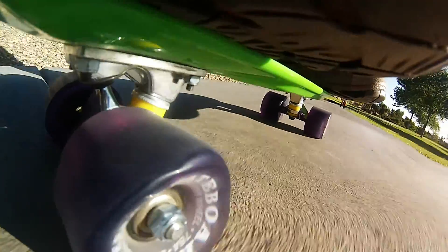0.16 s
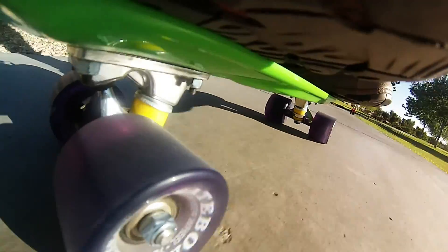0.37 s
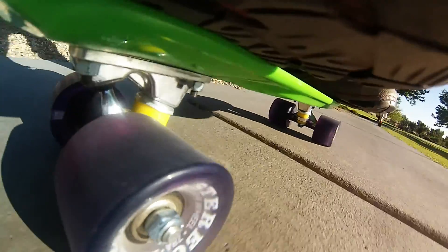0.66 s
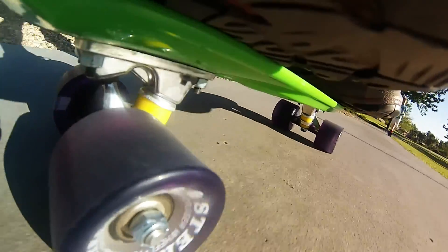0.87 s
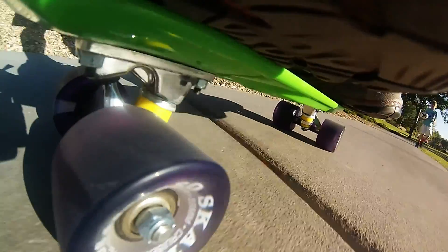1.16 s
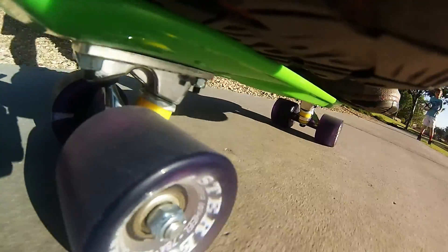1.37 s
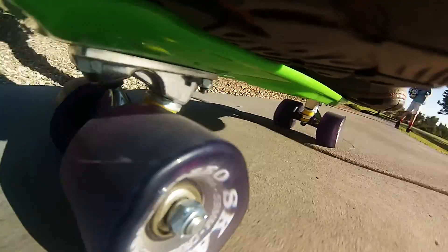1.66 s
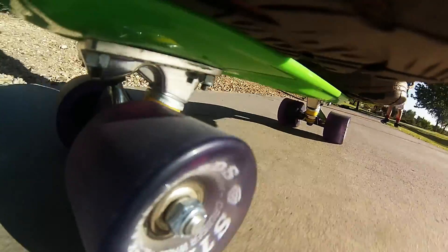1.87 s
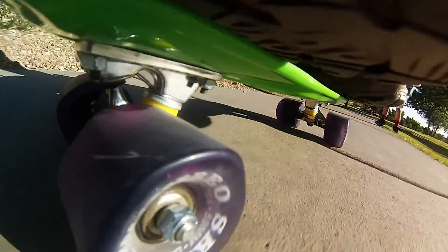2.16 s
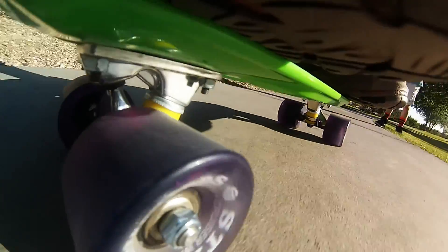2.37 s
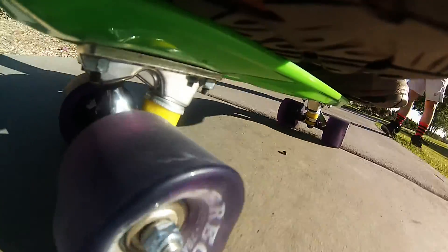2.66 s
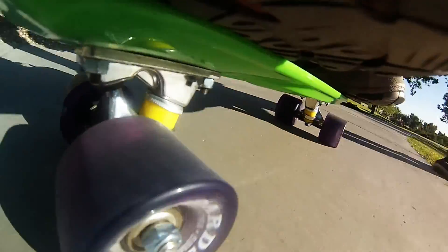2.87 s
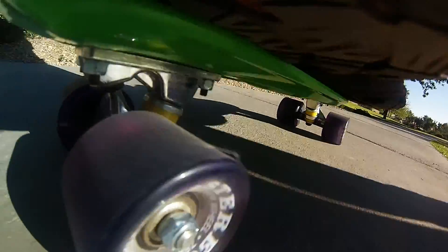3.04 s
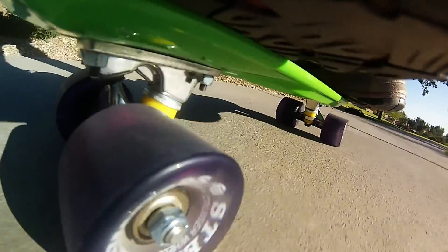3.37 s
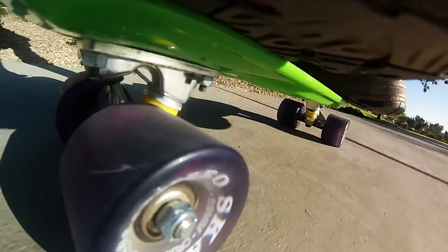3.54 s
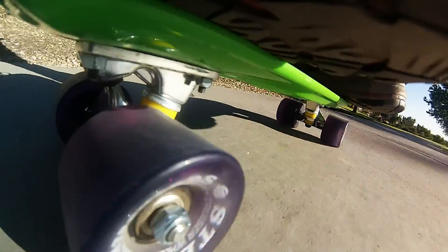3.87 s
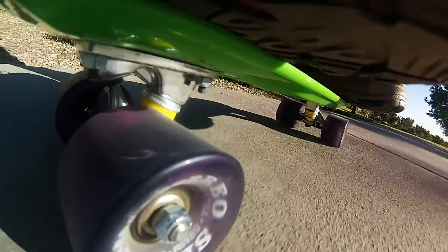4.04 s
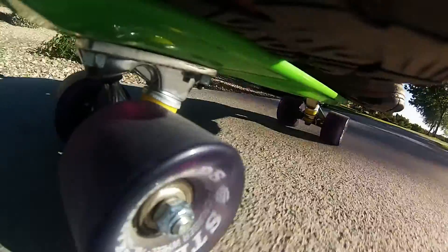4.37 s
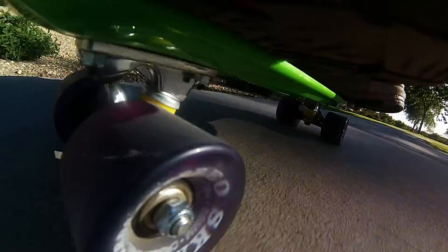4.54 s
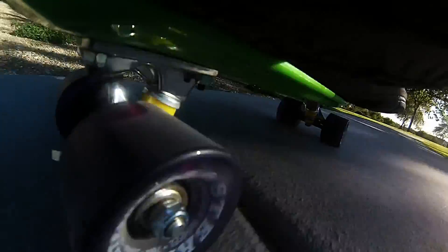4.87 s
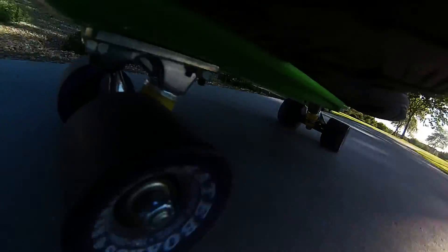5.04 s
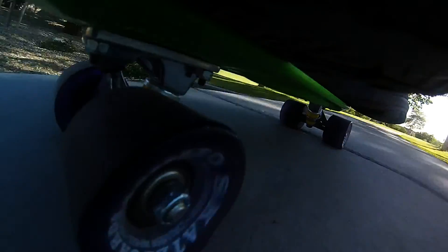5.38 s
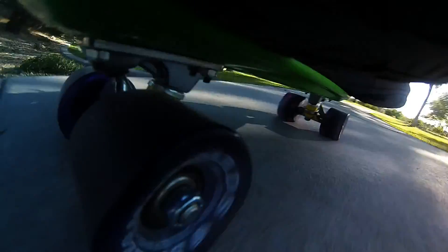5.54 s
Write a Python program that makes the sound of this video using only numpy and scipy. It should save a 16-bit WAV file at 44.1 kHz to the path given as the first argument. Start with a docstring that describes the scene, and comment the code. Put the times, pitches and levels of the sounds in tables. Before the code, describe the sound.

A plastic skateboard rolls on a concrete path outdoors, heard very close to a wheel. A dull, grainy rumble runs throughout, while two wheel sets drop into each joint with hard double clacks roughly every half second. Loose metal knocks and small ticks trail the blows, with light low wind on the microphone. Around four and a half seconds the surface gets rougher and rattly, then calms. The loudest hits distort slightly.

```python
"""On a concrete path a plastic skateboard rolls by, heard through a small camera clamped beside a wheel.
Road grain is noise that shakes the resonances of deck, trucks and camera case; wind buffets the microphone.
At each joint the wheels drop in: the deck bends, cracks and shudders. Ragged bursts make loose metal knock,
and clumps of faint ticks make it rattle. The camera's gain control ducks the sound after blows, and they clip."""
import sys
import numpy as np
from scipy import signal
from scipy.fft import rfft, irfft
from scipy.io import wavfile
from scipy.ndimage import uniform_filter1d

SR = 44100
rng = np.random.default_rng(int(sys.argv[2]) if len(sys.argv) > 2 else 0)


def wav_out(sig):
    """Save sig, one row per channel (or a flat mono array), as 16-bit PCM at SR to the path in sys.argv[1]."""
    wavfile.write(sys.argv[1], SR, np.round(np.clip(np.atleast_2d(sig).T, -1, 1) * 32767).astype(np.int16))


N = 251811

# Levels in the tables are relative; each source is given its place in the mix by its own function.
# Road grain under the wheels: [t/s, shaking level/dB]
ROAD = [(0.0, -26.5), (0.3, -25), (0.6, -26.5), (0.75, -31.5), (1.0, -23), (1.3, -26), (1.65, -24),
        (2.0, -22), (2.35, -27.5), (2.65, -19.5), (2.95, -27), (3.16, -18), (3.38, -21), (3.58, -20.5),
        (3.87, -25), (4.2, -17), (4.45, -11.5), (4.75, -22), (4.98, -19.5), (5.12, -26), (5.27, -19),
        (5.45, -23.5), (5.71, -23.5)]
# Gusts at the microphone: [t/s, level/dB]
GUSTS = [(0.0, -26.5), (0.3, -40.5), (1.4, -38.5), (2.2, -41), (2.8, -38.5), (3.25, -28), (3.7, -32),
         (4.0, -30.5), (4.17, -31.5), (4.4, -26.5), (5.02, -51), (5.26, -28), (5.42, -31), (5.71, -34)]
# Spectrum of the wind: [f/Hz, density/dB per Hz]
WIND_SPECTRUM = [(12, -45.5), (22, 10), (45, -12), (90, -10), (200, -56.5)]
# Rattling of loose parts on rough stretches: [t/s, level/dB]
RATTLE = [(0.0, -78), (0.4, -67.5), (0.5, -85.5), (1.4, -81), (1.9, -79), (2.02, -65), (2.12, -68),
          (2.2, -80), (2.42, -78), (2.51, -63), (2.62, -82), (2.95, -74), (3.1, -67), (3.22, -56),
          (3.55, -65.5), (3.85, -75.5), (3.95, -54.5), (4.18, -46), (4.4, -42), (4.5, -43), (4.6, -58),
          (5.0, -83.5), (5.4, -72), (5.71, -68)]
# Wheels dropping into joints: [t/s of the deepest bend, bend level/dB, nominal bend width/ms,
# crack delay after the bend/ms (negative is earlier), crack level/dB, shudder level/dB, shudder length/ms]
JOINTS = [(0.0911, -2, 2.26, 0.33, -2.5, -26, 12.7), (0.2335, 2.5, 1.67, 0.94, -4.5, -34.5, 56),
          (0.6738, -14.5, 2, 2.3, -8.5, -31.5, 27), (0.814, 3.5, 0.83, -2.5, 0, -21, 24),
          (1.1631, -9, 0.37, -9.5, -6.5, -21, 33.4), (1.301, -6, 1.12, -8, 1.5, -20, 21.2),
          (1.7079, -15, 3, -2, 0.5, -18.5, 18.5), (1.8287, 6.5, 1.12, 0, -2, -17.5, 14.2),
          (2.2172, -2, 2.1, -2.5, -18, -24.5, 27), (2.3431, 2.5, 1.58, -3, -8, -21, 32.4),
          (2.6271, -35, 1.4, 2.5, -16, -28.5, 10.3), (2.7401, -2.5, 2.15, -2.5, -13, -23, 11),
          (2.8511, 3.5, 1.32, 0, -10, -31.5, 46), (3.1959, -3.5, 2.1, -4, 0, -22.5, 30),
          (3.339, 0.5, 1.42, -2, 0.5, -39, 48), (3.6753, -7, 2.5, -5.5, -8, -23.5, 19.5),
          (3.7957, -4, 1.16, -2.5, 3.5, -25.5, 29), (4.2101, -5, 0.62, -5.5, 1, -20, 27.7),
          (4.3446, -1.5, 1.45, 0.9, 4.5, -22, 22), (4.837, 0, 2.65, -3, -4.5, -24.5, 22),
          (4.9709, -11, 0.59, -2.5, 9, -14.5, 19), (5.2222, -13.5, 4.4, -1.2, -15, -30.5, 14),
          (5.439, -3, 2.5, -2.5, -9, -24, 26.4), (5.575, -1.5, 2.3, -2.5, -14.5, -24, 38.6)]
# Truck and axle knocking on their play: [t/s, level/dB, treble level relative to the knock/dB]
KNOCKS = [(0.0881, -13, -17), (0.095, -11.5, -9), (0.231, -10, -4), (0.2349, -6, -14), (0.254, -20, -13),
          (0.276, -28, -9), (0.2813, -33, -7), (0.2868, -29, -6), (0.6714, -16, -6), (0.6785, -25.5, 0),
          (0.6826, -14, -23), (0.8062, -10.5, -11), (0.8135, -10, -9), (0.829, -21, -12),
          (0.9938, -35, -31), (1.1474, -19, -13), (1.155, 0.5, -15), (1.1774, -28, -18),
          (1.2039, -24.5, -3), (1.2857, -25, -7), (1.2948, 0.5, -18), (1.312, -14.5, -24.5),
          (1.323, -28, -6.5), (1.696, -23, -17), (1.7066, -7, -3), (1.721, -17.5, -30), (1.8182, -13, -8),
          (1.8274, 4.5, -27), (1.836, -12, -9), (1.85, -21, -19), (1.9032, -18.5, -12), (1.908, -21.5, -10),
          (2.0943, -35.5, -15), (2.2149, -11, -5.5), (2.2254, -23, -8), (2.234, -15, -15),
          (2.3458, -13, -4.5), (2.3527, -6, -18), (2.3607, -13, -27), (2.3698, -20.5, -8),
          (2.3826, -24, -6), (2.625, -10, -9), (2.738, -9, -11.5), (2.7731, -20.5, -5), (2.843, -13.5, -10),
          (2.8493, -10, -9), (2.8549, -14.5, -11), (2.8727, -14, -19), (2.8881, -39, -7), (2.8997, -35, -5),
          (2.905, -33, -6), (2.9126, -28, -10), (3.05, -30, -8), (3.1283, -38, -7), (3.1398, -22, -27),
          (3.1472, -14.5, -4), (3.1633, -16, -10), (3.1944, 0.5, -14.5), (3.211, -12.5, -27),
          (3.23, -20, -10), (3.2395, -24, -4), (3.251, -22, -7), (3.2571, -26, -9), (3.3237, -12, -6),
          (3.3339, -5, -17), (3.3399, 4, -20), (3.3605, -23, -2), (3.3685, -16.5, -3), (3.3816, -19.5, 1),
          (3.4194, -22.5, -11), (3.508, -27.5, -10), (3.5146, -21, -25), (3.526, -27.5, -26),
          (3.5327, -37, -9), (3.6685, 2.5, -37), (3.6724, -11.5, -10), (3.683, -30, 0), (3.6977, -34, -3),
          (3.7071, -35.5, 0), (3.7954, 5.5, -13), (3.8044, -21, -22), (3.8215, -21.5, -4),
          (3.8282, -26.5, 1), (3.8451, -29, -9), (3.9249, -30, -20), (3.9976, -45, -6), (4.0232, -42, -8),
          (4.0313, -40, -8), (4.049, -44, -4), (4.066, -41, -4), (4.0827, -50, 2), (4.2057, 2, -6.5),
          (4.2166, -22.5, -18.5), (4.235, -23, -16), (4.2617, -20.5, -14), (4.266, -21, -8),
          (4.2709, -20, -9), (4.2759, -22, -9), (4.2839, -25, -13), (4.3018, -26, -15), (4.3112, -29, -14),
          (4.321, -34, -11), (4.3376, -20, -14), (4.3442, 2.5, -32), (4.3613, -17, -26), (4.375, -14, -9),
          (4.4053, -9.5, -6), (4.416, -18, -13), (4.43, -15, -9), (4.462, -14, -12), (4.4786, -12.5, -11),
          (4.4869, -9, -16), (4.49, -25, -2), (4.5184, -17.5, -18), (4.8346, -2.5, -10.5),
          (4.849, -18, -22), (4.866, -28, -1), (4.941, -14.5, -25), (4.945, -17, -18), (4.9506, -20, -9),
          (4.9688, -33, -13), (4.9794, -16, -32), (5.2208, -18.5, -10.5), (5.414, -32, -15),
          (5.44, -9, -10), (5.444, -15.5, -36), (5.4563, -23, -15), (5.4825, -35, -5), (5.56, -34, -15),
          (5.574, -10.5, -38), (5.5803, -9.5, -29), (5.584, -9.5, -16), (5.599, -24, -4),
          (5.6348, -26.5, -7.5), (5.6505, -33, -14)]
# Modes of deck, trucks and camera case: [f/Hz, nominal width/Hz, level when rolled/dB, level when struck/dB]
MODES = [(29.8, 33, -8.5, -6), (84.6, 26.7, 0.5, 7.5), (175, 40.2, 2, -7.5), (265.7, 63, -8.5, 2),
         (363.3, 57.3, -1.5, -0.5), (474, 152, -11, -2), (588.4, 132.5, -14, 2), (756.7, 94, -12.5, -1),
         (926, 96, -25, -4.5), (1134, 216, -19.5, 3.5), (1259, 317, -21, -14), (1560, 250, -32.5, -4.5),
         (1984, 152, -24.5, 2), (2098, 155, -28.5, 6.5), (3106, 210, -70.5, -6.5), (3082, 130, -45, -10.5),
         (3470, 150, -47.5, -20), (3820, 130, -45, -18), (4490, 260, -53, -8.5), (5260, 360, -63, -3.5),
         (6030, 1100, -65, 3), (7100, 290, -80.5, -8.5), (9300, 2700, -96, -42.5), (10850, 840, -92, -4),
         (13400, 1200, -92.5, -29)]

# After a joint the wheels regain grip: duller and quieter at first
SETTLE_S, SETTLE_DB, SETTLE_TILT_DB, TILT_DB = 0.079, -1, -1, 1.48  # tilts are per octave
# The deck's low bend swells once the wheels have settled
HUM_AFTER_S, HUM_WIDTH_S, HUM_DB, HUM_DIP_DB = 0.18, 0.055, 1, -0.5
# The slowest bends keep swaying after a joint
SWAY_DB, SWAY_S = 4.5, 0.12
# Small knocks that trail each joint
CHATTER_S, CHATTER_DB, CHATTER_FADE_DB = 0.035, -38, -10
CHATTER_TREBLE_DB, CHATTER_SPREAD_DB = -12.5, 5.5
HISS_DB = -80.5  # the preamplifier's faint hiss, before its low-pass filters; added after the gain control
EDGE_HZ = 16220  # upper band limit


def gain_of(db):
    """Turns decibels into a factor."""
    return 10 ** (np.asarray(db) / 20)


def evened(x):
    """Scales a sound to rms 1."""
    return x / np.sqrt(np.mean(x ** 2) + 1e-20)


def curve(rows):
    """Draws straight lines through the columns of a table, one value per sample."""
    s, *columns = np.transpose(rows)
    return [np.interp(np.arange(N) / SR, s, column) for column in columns]


def drift(rate_hz):
    """Wanders slowly at random, rms 1: low-passed noise drawn at every 16th sample."""
    low_pass = signal.butter(2, rate_hz, fs=SR / 16, output="sos")
    slow = signal.sosfilt(low_pass, rng.standard_normal(N // 16 + 1))
    return evened(np.interp(np.arange(N) / 16, np.arange(len(slow)), slow))


def mode(x, hz, width):
    """One resonance applied twice, so that the valleys beside it stay dark; gain 1 at the centre."""
    pole = np.exp((2j * np.pi * hz - 1.55 * np.pi * width) / SR)
    for _ in range(2):
        x = signal.lfilter([1 - abs(pole)], [1, -pole], x)
    return 2 * x.real


def struck(force, lo, hi, damping):
    """The modes from lo to hi Hz ring after a force, widened by damping; a one-sample blow peaks at 1."""
    rows = [(hz, width * damping + 0.02 * hz, db) for hz, width, _, db in MODES if lo <= hz < hi]

    def ring(x):
        return sum(gain_of(db) * mode(x, hz, width) / width for hz, width, db in rows)

    return ring(force) / abs(ring(signal.unit_impulse(2000))).max()


def bursts(times, db, ms, tail_db=-61.0):
    """A ragged force at each time: noise that rises fast and decays over ms, then a weak slower tail."""
    length = 900  # samples
    out = np.zeros(N + length)
    noises = rng.standard_normal((len(times), length))
    u = np.arange(length) / (SR * ms / 1000)
    envelope = np.minimum(7.1 * u, 1) * (np.exp(-u) + gain_of(tail_db) * np.exp(-u / 11.0))
    for s, level_db, noise in zip(times, db, noises):
        push = noise * envelope
        out[round(s * SR):][:length] += gain_of(level_db) * push / np.linalg.norm(push)  # equal energy
    return out[:N]


def rolling():
    """Grain noise shakes every mode; each flickers by itself, and all throb together over bumps."""
    t = np.arange(N) / SR
    joint_s = np.array([-1.] + [s for s, *_ in JOINTS])
    since = t - joint_s[np.searchsorted(joint_s, t) - 1]  # seconds since the last joint
    loose = np.exp(-since / SETTLE_S)
    shake_db = curve(ROAD)[0] + SETTLE_DB * loose
    tilt_db = TILT_DB + SETTLE_TILT_DB * loose
    hum_db = HUM_DB * np.exp(-((since - HUM_AFTER_S) / HUM_WIDTH_S) ** 2) + HUM_DIP_DB * loose
    sway_db = SWAY_DB * np.exp(-((since - 0.08) / SWAY_S) ** 2)
    after = np.exp(-((since - 0.065) / 0.047) ** 2)
    bumps = drift(11.8)
    out = 0
    for hz, width, rolled_db, _ in MODES:
        octaves = np.log2(hz / 500)
        db = rolled_db - 1.55 * octaves + tilt_db * np.clip(octaves, -1, 2)
        db = db + hum_db * (150 < hz < 300) + sway_db * (hz < 120)
        db = db - 5.8 * after * np.exp(-(octaves / 1.6) ** 2)  # modes around 500 Hz dip after a joint
        flicker_db = 1.2 * drift(10.0)
        soft = signal.butter(2, 1.25 * hz, fs=SR, output="sos")  # little spills above each mode
        ringing = signal.sosfilt(soft, mode(rng.standard_normal(N), hz, width))
        out = out + gain_of(db + 1.7 * bumps + flicker_db) * ringing
    return gain_of(shake_db + 25.0) * out


def wind():
    """Lumpy low buffeting at the microphone port: noise shaped in frequency, then swelled by gusts."""
    hz = np.fft.rfftfreq(N, 1 / SR)
    f, db = np.transpose(WIND_SPECTRUM)
    shape_db = np.interp(np.log(hz + 1), np.log(f), db, -90, -90)
    noise = irfft(rfft(rng.standard_normal(N)) * gain_of(shape_db), N)
    return gain_of(curve(GUSTS)[0] + 6.5 + 1.2 * drift(5.9)) * evened(noise)


def rattle():
    """Loose parts tick faintly, unevenly and in clumps; each ragged touch lasts about a millisecond."""
    chance = 240.0 * gain_of(3.0 * drift(15.0)) / SR  # of a tick at each sample
    size = gain_of(3.0 * np.minimum(rng.exponential(1, N), 4)) * (rng.random(N) < chance)
    fade = np.exp(-1 / (0.0007 * SR))
    ticks = signal.lfilter([1], [1, -fade], size) * rng.standard_normal(N)
    sound = struck(ticks, 4000, 9000, damping=2.4)
    sound += 0.18 * struck(ticks, 9000, 20000, damping=1.2)
    sound += 1.8 * struck(ticks, 1500, 4000, damping=1.6)
    return gain_of(curve(RATTLE)[0]) * evened(sound)


def joints():
    """The deck bends down and springs back, its modes ring, and the whole board shudders for a moment."""
    before, behind = 1000, 5000  # samples around the deepest bend
    t = np.arange(-before, behind) / SR
    bend, shaking = np.zeros(N + behind), np.zeros(N + behind)
    for s, db, ms, lag, _, shudder_db, length in JOINTS:
        near = slice(round(s * SR) - before, round(s * SR) + behind)
        u = t / (0.65 * ms / 1000)
        bend[near] -= gain_of(db) * (1 - u ** 2) * np.exp(-u ** 2 / 2)
        # the shudder starts 3.5 ms ahead of the bend, or of the crack where that is earlier
        v = np.clip((t - min(lag, 0) / 1000 + 0.0035) / (length / 1000), 0, 3)
        shaking[near] += gain_of(shudder_db) * np.minimum(11.0 * v, 1) * np.exp(-v ** 3)

    s, db, ms, lag, crack_db, *_ = np.transpose(JOINTS)
    push_db = db + 20 * np.log10(ms / 2.45)  # a broad bend hands the low modes more momentum
    low = struck(bursts(s, push_db, 0.2), 60, 500, damping=1.3)
    crack = struck(bursts(s + lag / 1000, crack_db, 2.0), 500, 1500, damping=2.0)

    force = rng.standard_normal(N) * gain_of(4.77 * drift(170.0))  # ragged: parts touch and let go
    shudder = evened(struck(force, 200, 1500, damping=1.0))
    shudder += 0.27 * evened(struck(force, 1500, 4000, damping=1.3))
    shudder += 0.028 * evened(struck(force, 4000, 20000, damping=0.22))

    thump = gain_of(3.5) * bend[:N] + gain_of(-3.0) * low
    return thump + gain_of(11.5) * crack + gain_of(12.5) * shaking[:N] * shudder


def knocks():
    """Metal hits metal: ragged blows set off short rings of the middle and high modes."""
    s, db, treble_db = np.hstack([np.transpose(KNOCKS), chatter()])
    body = struck(bursts(s, db, 0.54, tail_db=-14.0), 1500, 4000, damping=2.67)
    deck = struck(bursts(s, db, 0.94), 550, 1500, damping=3.0)  # the deck answers each knock
    top = struck(bursts(s, db + treble_db, 0.36, tail_db=-15.0), 4000, 7000, damping=0.53)
    edge = struck(bursts(s, db + treble_db, 0.94, tail_db=-33.0), 7000, 20000, damping=0.83)
    return gain_of(6.0) * body + gain_of(1.5) * deck + gain_of(1.5) * top + gain_of(-7.0) * edge


def chatter(count=4):
    """A few small knocks at chance moments after each joint, on average weaker the later they come."""
    late = rng.random((len(JOINTS), count))
    level_spread, treble_spread = rng.standard_normal((2, len(JOINTS), count))
    s = np.array(JOINTS)[:, :1] + 0.005 + CHATTER_S * late
    db = CHATTER_DB + CHATTER_FADE_DB * late + CHATTER_SPREAD_DB * level_spread
    treble_db = CHATTER_TREBLE_DB + CHATTER_SPREAD_DB * treble_spread
    return np.array([s, db, treble_db]).reshape(3, -1)


def scene():
    """All sources add up at the one microphone."""
    return (rolling() + wind() + rattle() + joints() + knocks())[None]


def record(dry):
    """Gain control falls a little after each blow and recovers; the converter clips; then the band limit."""
    power_db = 10 * np.log10(abs(uniform_filter1d(dry[0] ** 2, 300)) + 1e-12)
    fall = np.arange(N) * 94.8 / SR  # the held peak level sinks by 94.8 dB a second
    held_db = np.maximum.accumulate(power_db + fall) - fall
    over_db = np.maximum(held_db + 16.5, 0)  # excess over a threshold of -16.5 dB
    slow = np.exp(-1 / (0.015 * SR))  # the gain moves too late to catch the blow itself
    late_db = signal.lfilter([1 - slow], [1, -slow], np.roll(over_db, round(0.0056 * SR)))
    ducked = dry / gain_of(0.76 * late_db)

    hiss_filter = signal.butter(10, 12500.0, fs=SR, output="sos")
    hiss = signal.sosfilt(hiss_filter, rng.standard_normal(N))
    clipped = np.clip(ducked + gain_of(HISS_DB) * hiss, -1, 1)

    dulled = signal.sosfilt(signal.butter(6, 15000.0, fs=SR, output="sos"), clipped)  # the top fades early
    band_limit = signal.firwin(511, EDGE_HZ, window=("kaiser", 9), fs=SR)
    return signal.oaconvolve(dulled, band_limit[None], "same")


dry = scene()
out = record(dry)
wav_out(out)
```